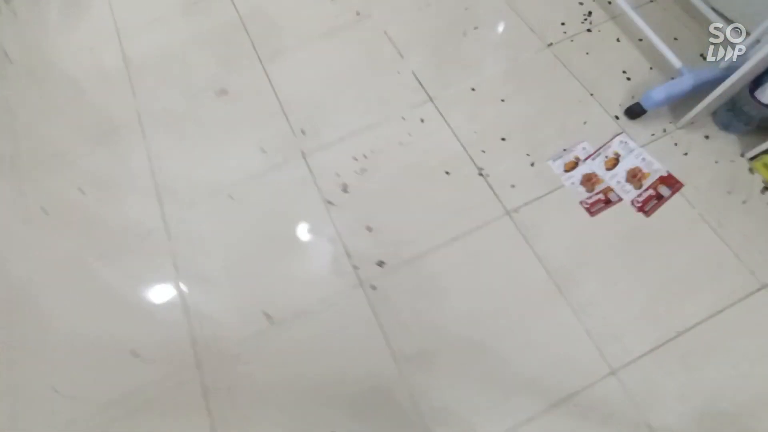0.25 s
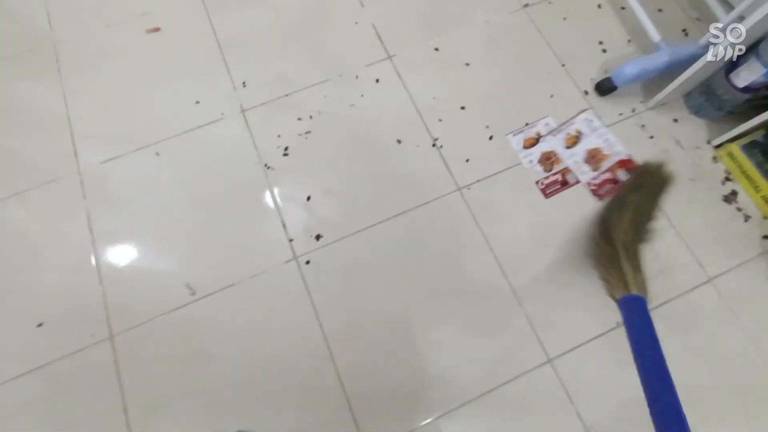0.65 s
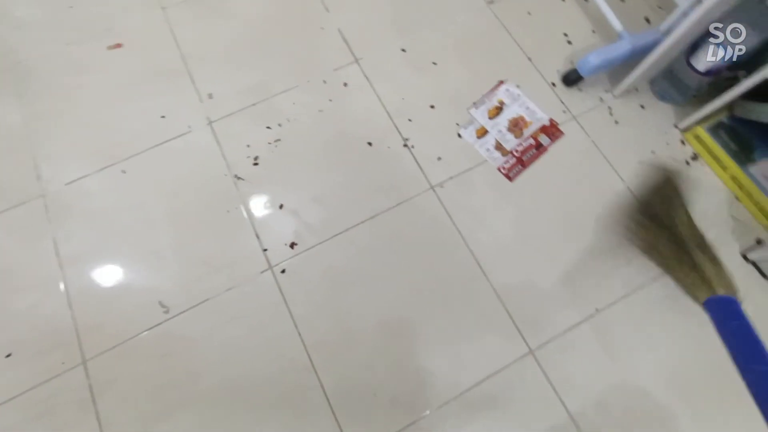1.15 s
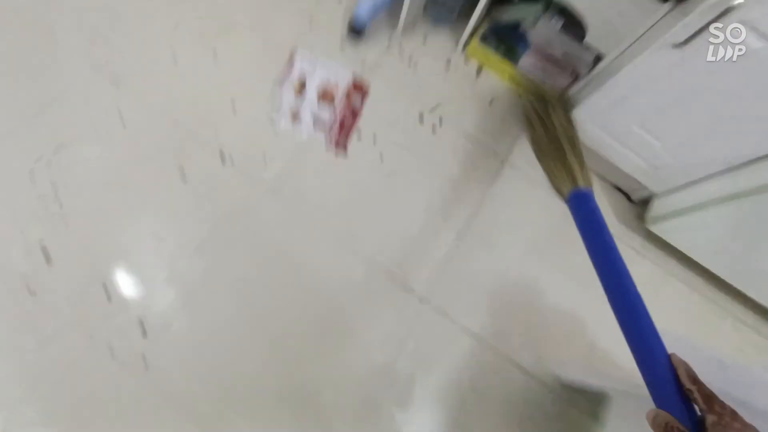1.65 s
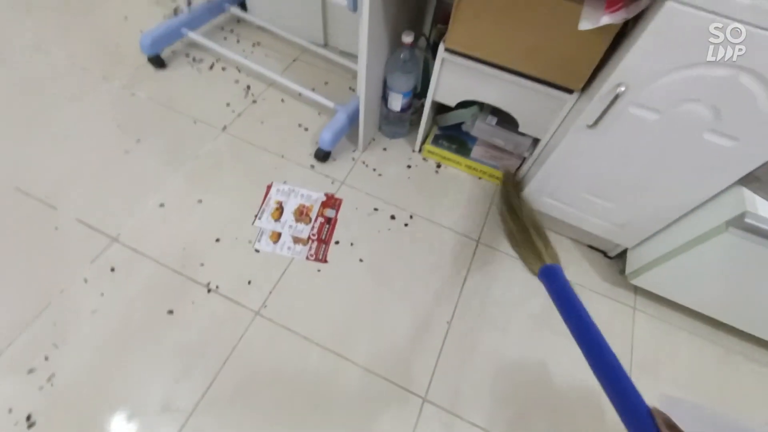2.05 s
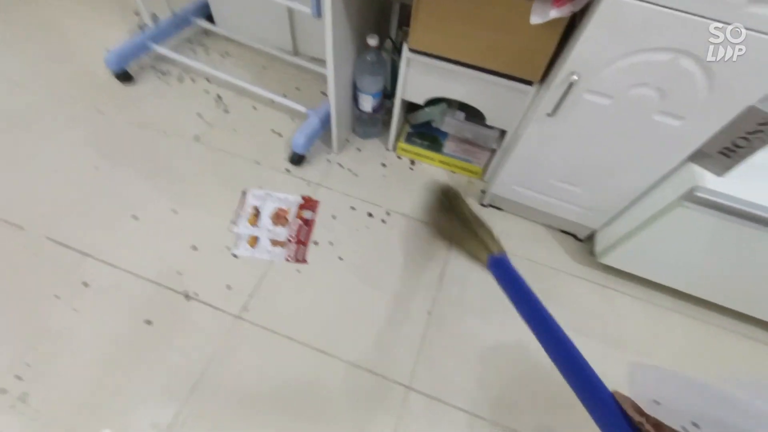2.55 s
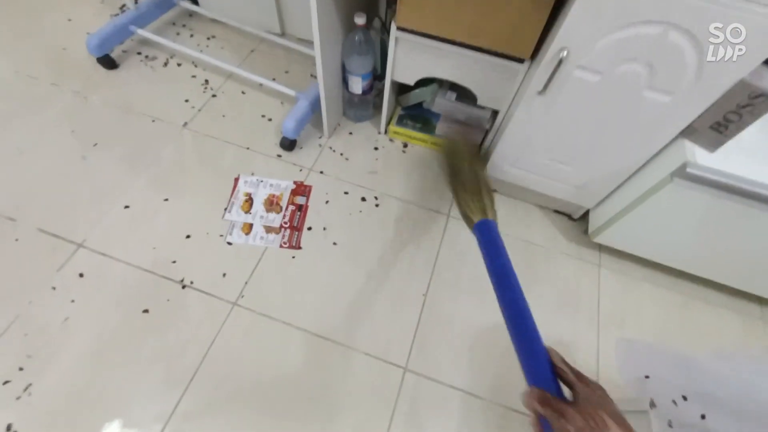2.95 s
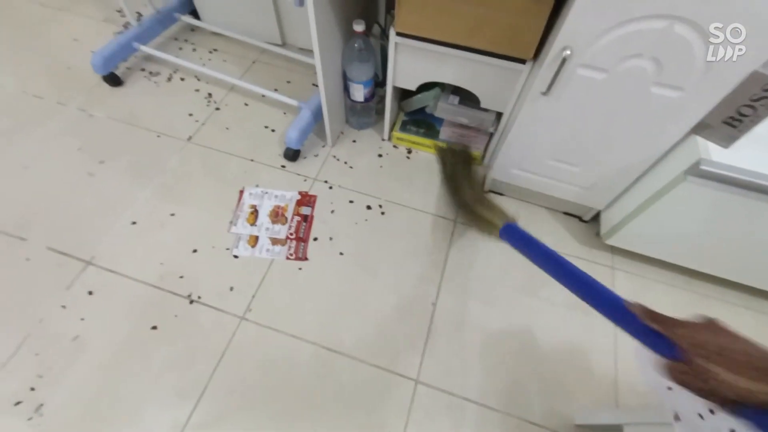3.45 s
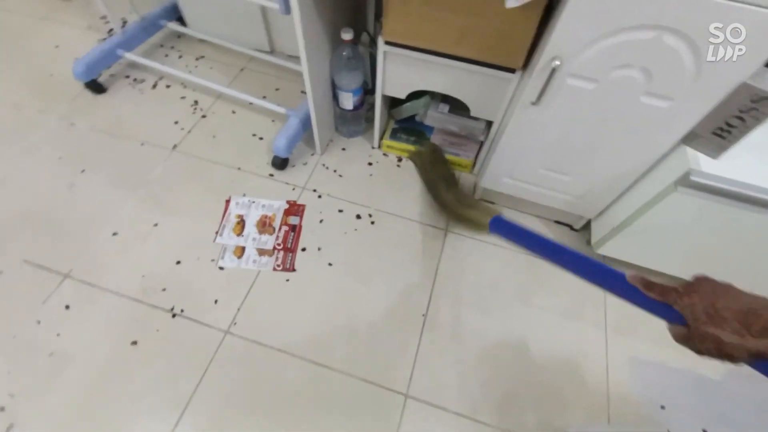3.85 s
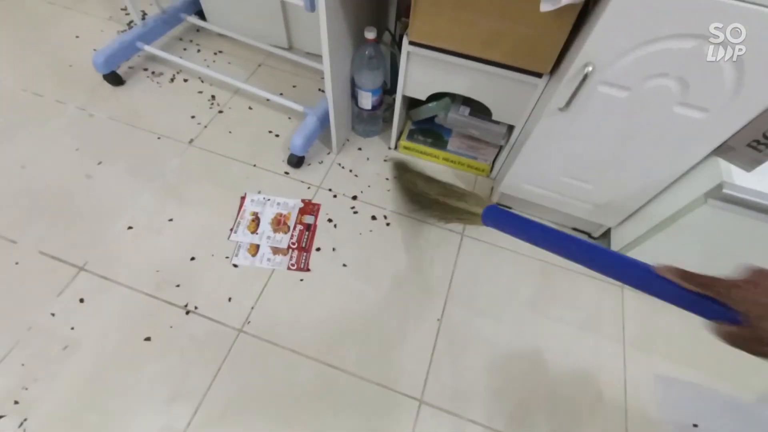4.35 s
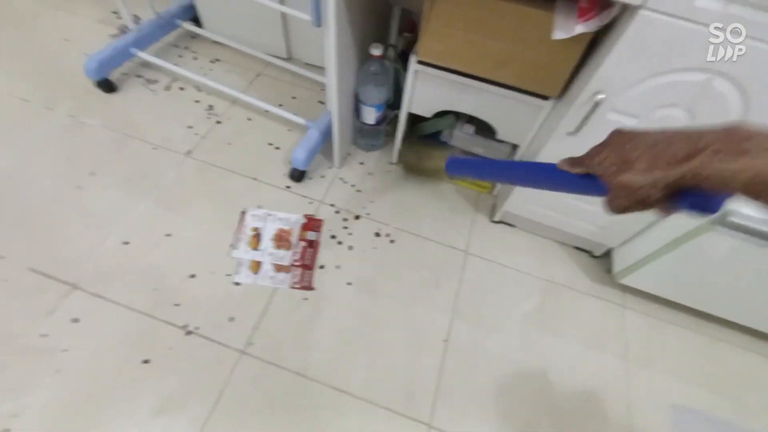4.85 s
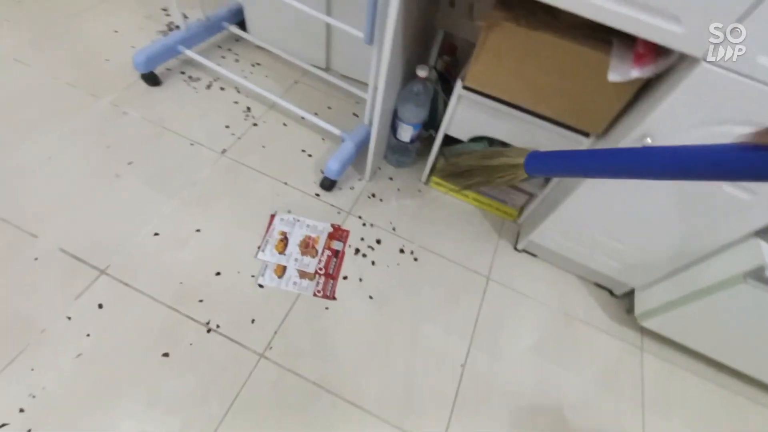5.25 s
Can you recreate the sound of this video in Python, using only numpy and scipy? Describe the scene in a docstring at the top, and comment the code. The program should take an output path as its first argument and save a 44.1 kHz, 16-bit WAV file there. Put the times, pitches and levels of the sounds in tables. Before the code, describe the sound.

Brisk, raspy broom strokes swish across smooth tiles, with tiny crackling ticks and faint cupboard knocks over a low indoor hum.

```python
"""A grass broom sweeps dry petals over a tiled floor beside hollow cupboards in a quiet home.
Thousands of fibre tips slip on the glaze as noise-like pulse trains; stiff fibres twang and tick.
A second, coarser train of slips drives resonances of fibre bundle, stems, cupboard doors and carcass.
Behind: short room echo, a few faint far sine tones, a motor hum of wandering sines, rumbling noise."""
import sys
import numpy as np
from scipy import signal
from scipy.fft import rfft, irfft, next_fast_len
from scipy.io import wavfile
from scipy.ndimage import map_coordinates

SR = 44100
rng = np.random.default_rng(int(sys.argv[2]) if len(sys.argv) > 2 else 0)


def volts_from_decibels(level):
    """Turn decibel levels (scalar or array-like) into linear amplitude factors."""
    exponent = np.asarray(level, float) / 20
    return 10 ** exponent


def wav_out(sig):
    """Save sig, one row per channel (or a flat mono array), as 16-bit PCM at SR to the path in sys.argv[1]."""
    wavfile.write(sys.argv[1], SR, np.round(np.clip(np.atleast_2d(sig).T, -1, 1) * 32767).astype(np.int16))


N = 243423
HALVES = np.array([[.5], [-.5]])   # left, right share of a left-right difference


def rms_one(x):
    """Scales to rms 1."""
    return x / np.sqrt(np.mean(x ** 2) + 1e-20)


def at_hz(points, hz):
    """Table columns interpolated over log frequency."""
    at, *columns = np.transpose(points)
    return [np.interp(np.log(hz), np.log(at), c) for c in columns]


def in_time(rows):
    """Table columns interpolated over time."""
    s, *columns = np.transpose(rows)
    return [np.interp(np.arange(N) / SR, s, c) for c in columns]


def drift(pole_hz):
    """Slow chance of rms 1: noise at every 40th sample through a double one-pole."""
    r = np.exp(-80 * np.pi * pole_hz / SR)
    noise = rng.standard_normal(N // 40 + 2002)
    slow = signal.lfilter([1], [1, -2 * r, r * r], noise)[2000:]   # settled part
    return np.interp(np.arange(N) / 40, np.arange(len(slow)), rms_one(slow))


def resonance(x, hz, width_hz):
    """Two-pole resonance with gain 1 on top."""
    r = np.exp(-np.pi * width_hz / SR)
    poles = [1, -2 * r * np.cos(2 * np.pi * hz / SR), r * r]
    return signal.lfilter([(1 - r * r) / 2, 0, (r * r - 1) / 2], poles, x)


def two_sided(mid_side, likeness, hz):
    """Left and right share the first signal and differ by the second."""
    alike, pan_db = at_hz(likeness, hz)
    alike = np.clip(alike, -1, 1)
    mid, side = np.sqrt(1 + alike) * mid_side[0], np.sqrt(1 - alike) * mid_side[1]
    return volts_from_decibels(HALVES * pan_db) * (mid + side * 2 * HALVES)


def bank(sources, spectrum, likeness, count, patchy_db, patchy_hz):
    """Bands of equal pitch width, each with its level, flicker and likeness; rms 1."""
    edges_hz = np.geomspace(spectrum[0][0], min(spectrum[-1][0], .45 * SR), count + 1)
    out = 0
    for k, (low, high) in enumerate(zip(edges_hz, edges_hz[1:])):
        hz = np.sqrt(low * high)
        band_pass = signal.butter(2, [low, high], "band", fs=SR, output="sos")
        band = signal.sosfilt(band_pass, sources[k % 2])
        level_db = at_hz(spectrum, hz)[0] + patchy_db * drift(patchy_hz)
        out = out + volts_from_decibels(level_db) * two_sided(band, likeness, hz)
    return rms_one(out)


def below(x):
    """Zero-phase low-pass at 6600 Hz: the part of the sound treated apart from the treble."""
    return signal.sosfiltfilt(signal.butter(6, 6600, fs=SR, output="sos"), x)


# left-right likeness of the sweep before its stereo image [pitch_hz, correlation, left_over_right_db]
SWEEP_LIKENESS = [(300, 1, -1), (875, 0.64, -4.5), (2530, 0.42, -3), (5600, 0.43, -1), (14200, 0.68, 1.5)]
# fibre tip spectrum, relative power density [pitch_hz, density_db]
TIP_SPECTRUM = [(3700, -15.5), (4800, -8.5), (5500, -6), (7000, -7), (8700, -5.5), (10000, -9.5)]
# finest tip spectrum, relative power density [pitch_hz, density_db]
FINEST_SPECTRUM = [(10000, -7), (12000, -4), (14500, -4), (18000, -17)]
# fibre bundle modes [pitch_hz, width_hz, relative_db]
BUNDLE_MODES = [(2380, 440, 0.5), (2480, 470, 8.5), (2820, 410, 7), (3130, 104, 2)]
# stem modes [pitch_hz, width_hz, relative_db]
STEM_MODES = [(1284, 140, -3), (1470, 166, 2.5), (1777, 116, 6)]
# cupboard door modes [pitch_hz, width_hz, relative_db]
DOOR_MODES = [(862, 86, -1.5), (922, 187, 8), (1052, 76, -1.5)]
# cupboard carcass modes [pitch_hz, width_hz, relative_db]
CARCASS_MODES = [(258, 93, -1), (358, 84, -3.5), (624, 204, -7)]
# head pressure and nearness to the cupboards, levels re tips
# [time_s, stems_db, door_db, carcass_db]
PRESSURE = [(0, -41, -24, -33), (.5, -25, -13, -18), (.8, -20.5, -28, -34), (1.05, -12, -14.5, -18),
            (1.42, -18.5, -20, -24.5), (1.8, -13.5, -17, -22), (2.1, -14, -20.5, -24),
            (2.43, -25, -20, -30), (2.9, -19.5, -20.5, -17.5), (3.34, -12, -7, -14),
            (3.5, -12.5, -14.5, -23), (3.8, -9.5, -16, -18.5), (4.3, -17.5, -23.5, -28.5),
            (4.72, -15.5, -27, -23), (4.85, -20, -19, -11), (4.97, -8.5, -11, -15), (5.35, -20, -23.5, -24),
            (5.45, -17.5, -14, -13)]


def broom():
    """Tips hiss, bundle and stems rasp, door and carcass add body; the head moves left to middle."""
    tips, finest, bundle = pushes()
    stems_db, door_db, carcass_db = in_time(PRESSURE)
    fine = [slips(7000, uneven_db=1.5, clump_db=1.65) for source in range(2)]
    coarse = slips(4000, uneven_db=0.5, clump_db=1.0)
    sound = tips * bank(fine, TIP_SPECTRUM, SWEEP_LIKENESS, count=16, patchy_db=2.5, patchy_hz=18)
    sound = sound + tips * volts_from_decibels(-5.5) * twang(1000, cycles=76)
    sound = sound + finest * bank(fine, FINEST_SPECTRUM, SWEEP_LIKENESS, count=10,
                                  patchy_db=2.0, patchy_hz=9.2)
    bodies = [(bundle, BUNDLE_MODES), (tips * volts_from_decibels(stems_db), STEM_MODES),
              (tips * volts_from_decibels(door_db), DOOR_MODES), (tips * volts_from_decibels(carcass_db), CARCASS_MODES)]
    for height, modes in bodies:
        sound = sound + height * body(modes, coarse, patchy_db=4.0)
    return stereo_image(sound + ticks() + bumps())


# pushes of the broom head
# [lands_s, swell_s, lift_db_per_s, tips_db, finest_re_tips_db, bundle_re_tips_db]
BROOM_PUSHES = [(-.01, 0.084, 334, -47.5, 5, -12.5), (.13, 0.12, 212, -56, 1.5, -11.5),
                (0.444, 0.13, 184, -51, -1, -7), (.58, 0.035, 295, -57, 13.5, -28),
                (0.682, 0.11, 148, -48, 0.5, -30), (0.96, 0.034, 170, -46.5, 6.5, -4.5),
                (1.059, 0.069, 170, -57, 14.5, -11), (1.17, 0.055, 159, -59.5, 10.5, -23),
                (1.376, 0.044, 267, -37.5, 2, -3.5), (1.50, 0.013, 192, -54, 8, -27),
                (1.69, 0.042, 206, -45, 1, -4.5), (1.73, 0.066, 240, -37.5, -0.5, -9),
                (2.052, 0.038, 200, -41, -3.5, -6), (2.09, 0.065, 264, -40.5, 4, -6.5),
                (2.402, 0.017, 218, -46.5, -4, -7), (2.553, 0.013, 198, -67.5, 6, -6),
                (2.712, 0.025, 200, -53.5, 3, -17), (2.74, 0.043, 203, -39.5, -1, -7),
                (2.988, 0.062, 234, -45.5, 2.5, -5.5), (3.1, 0.041, 222, -55, 4.5, -2),
                (3.291, 0.046, 197, -40.5, 1, -4), (3.37, 0.031, 200, -49, -3, -1.5),
                (3.43, 0.068, 402, -41.5, 2.5, -2.5), (3.736, 0.032, 193, -43.5, 2, -3.5),
                (3.779, 0.034, 202, -45, -5, 1), (3.859, 0.061, 326, -44.5, 1.5, -4.5),
                (3.949, 0.016, 300, -65.5, 24.5, -24), (4.186, 0.059, 200, -41.5, -2.5, -8),
                (4.26, 0.054, 205, -52, -8, -6.5), (4.329, 0.033, 400, -48, -0.5, -11),
                (4.5, 0.016, 124, -75, 4, -8), (4.689, 0.039, 198, -44.5, -2, -14),
                (4.75, 0.044, 150, -45, -1.5, -11.5), (4.862, 0.12, 339, -37.5, 1, -9),
                (5.1, 0.074, 200, -72, 6, -6), (5.332, 0.08, 165, -42, 0, -10.5),
                (5.47, 0.076, 200, -45.5, -1, -10)]


def pushes():
    """Heights of tips, finest tips, bundle: each push lands, swells, lifts, trails; powers add."""
    touch_s, landing_db_per_s, swell_db = 0.0084, 1000, 12
    trail_db, trail_db_per_s, trail_finest_db = -27.5, 70, 5.5
    t, power = np.arange(0, N + 32, 32) / SR, 0
    for lands_s, swell_s, lift_db_per_s, tips_db, finest_db, bundle_db in BROOM_PUSHES:
        after_s = t - lands_s - swell_s   # time past the peak
        swell_lift_db = np.minimum(swell_db * after_s / swell_s, -lift_db_per_s * after_s)
        landing_db = np.minimum(landing_db_per_s * (t - lands_s - touch_s), 0)
        main = volts_from_decibels(tips_db + swell_lift_db + landing_db)
        trail = (after_s > 0) * volts_from_decibels(tips_db + trail_db - trail_db_per_s * np.abs(after_s))
        trail = trail * volts_from_decibels(np.array([[0], [trail_finest_db], [0]]))
        shares = volts_from_decibels(2 * np.array([[0], [finest_db], [bundle_db]]))   # power ratios
        power = power + (main ** 2 + trail ** 2) * shares
    return [np.interp(np.arange(N) / SR, t, np.sqrt(p)) for p in power]


def slips(per_s, uneven_db, clump_db):
    """Two trains of fibre slips: random pulses of uneven size and either sign, in clumps."""
    sizes_db = uneven_db * np.minimum(rng.exponential(1, (2, N)), 5)
    sizes = volts_from_decibels(sizes_db) * rng.choice([-1, 1], (2, N))
    happens = rng.random((2, N)) < per_s / SR
    return sizes * happens * volts_from_decibels(clump_db * drift(41)) + 1e-18


def twang(per_s, cycles):
    """Stiff fibres are plucked and ring briefly at pitches set by their free length."""
    train = slips(per_s, uneven_db=0.5, clump_db=1.5)
    dealt, out = rng.integers(0, 36, N), 0   # which fibre each slip plucks
    for k, hz in enumerate(np.geomspace(2000, 11000, 36) * rng.uniform(1.0, 1.02, 36)):
        rung = resonance(train * (dealt == k) + 1e-18, hz, hz / cycles)
        out = out + two_sided(rung, SWEEP_LIKENESS, hz)
    return rms_one(out)


def body(modes, train, patchy_db):
    """The slips ring broad modes, each filtered twice so that the skirts are steep; rms 1."""
    out = 0
    for hz, width_hz, db in modes:
        rung = resonance(resonance(train, hz, 1.5 * width_hz), hz, 1.5 * width_hz)
        out = out + volts_from_decibels(db + patchy_db * drift(19.2)) * two_sided(rung, SWEEP_LIKENESS, hz)
    return rms_one(out)


# single stiff fibres and petals snapping loose, and at 1.516 s a crack marking a sudden swell of the sweep,
# peak before stereo image [start_s, peak_db, pitch_hz]
SNAPS = [(0.6005, -37, 13500), (0.967, -44, 13750), (1.3904, -27, 14100), (1.404, -20, 13300),
         (1.4257, -31, 10400), (1.516, -31, 11100), (1.698, -37, 13200), (2.064, -35, 9000),
         (2.406, -30, 5740), (2.409, -39, 2760), (2.423, -34, 6690), (2.561, -49, 11800),
         (2.716, -42, 11900), (2.7456, -33, 9900), (2.9923, -42, 10100), (3.053, -27, 10200),
         (3.3, -49, 2480), (3.3254, -36, 11800), (3.744, -43, 5460), (3.974, -39, 11500),
         (4.1939, -52, 13000), (4.509, -45.5, 11100), (4.6954, -56, 6620), (4.779, -33, 10700),
         (5.086, -39, 11200), (5.155, -46, 13200), (5.221, -41, 12200), (5.337, -56, 7350)]


def ticks():
    """Each snap is a millisecond crack over the whole treble plus a short ring at its own pitch."""
    out, t = np.zeros(N), np.arange(400) / SR
    for start_s, peak_db, hz in SNAPS:
        crack = rng.standard_normal(400) * np.exp(-t / 0.002)
        treble = resonance(resonance(crack, 9000, 9000), 9000, 9000)
        snap = resonance(crack, hz, .25 * hz) + volts_from_decibels(-6) * treble
        out[round(start_s * SR):][:len(t)] += volts_from_decibels(peak_db) * snap / np.abs(snap).max()
    return out


# broom bumps hollow furniture, peak before stereo image [start_s, peak_db, pitch_hz]
FURNITURE_BUMPS = [(0.481, -57, 469), (1.413, -59, 221), (2.089, -53.5, 225), (2.78, -77, 204),
                   (3.033, -51, 346), (3.322, -56, 454), (4.791, -53.5, 250), (4.926, -57, 240),
                   (5.438, -62, 395)]


def bumps():
    """Each bump is a short damped ring at its own pitch with a rounded start."""
    out, t = np.zeros(N), np.arange(int(.12 * SR)) / SR
    for start_s, peak_db, hz in FURNITURE_BUMPS:
        ring = (1 - np.exp(-t * 150)) * np.exp(-t * hz / 3.9) * np.sin(2 * np.pi * hz * t)
        ring = volts_from_decibels(peak_db) * ring / np.abs(ring).max()
        start = round(start_s * SR)
        out[start:][:len(t)] += ring[:N - start]
    return out


# left lead and level as the head moves; last column: level of the treble's left-right difference
# [time_s, left_ahead_ms, left_over_right_db, treble_difference_db]
STEREO_COURSE = [(0, 0.31, 5.5, 4), (.5, 0.28, 3, -2.5), (1.4, 0.34, 2.5, 2.5), (1.8, 0.12, 1, 2.5),
                 (2.1, .11, 1, 2), (2.2, 0.15, -0.5, -11), (3.4, 0.015, 0.5, -10), (5.2, 0.051, 1.5, -8),
                 (5.45, 0.021, .5, -1)]


def stereo_image(sound):
    """Left-right lead and level follow the head; the treble's difference narrows and widens over time."""
    ahead_ms, pan_db, difference_db = in_time(STEREO_COURSE)
    low = below(sound)
    left, right = sound - low
    treble = (left + right) / 2 + volts_from_decibels(difference_db) * (left - right) * HALVES
    low[0] = map_coordinates(low[0], [np.arange(N) + ahead_ms * SR / 1000], mode="nearest")
    return (low + treble) * volts_from_decibels(HALVES * pan_db)


def room(x):
    """Eight feedback delays a side, duller on every round."""
    t60_s, wall_cut_hz, gain_db = 0.074, 23000, -3.5
    out, size = np.zeros((2, N)), next_fast_len(N + SR)
    w = 2 * np.pi * np.arange(size // 2 + 1) / size
    dull = 1 / (1 + 1j * w * SR / (2 * np.pi * wall_cut_hz))
    heard = rfft(x, size)
    for k, lag in enumerate(rng.uniform(.009, 0.027, 16) * SR):
        loop = volts_from_decibels(-60 * lag / SR / t60_s) * dull * np.exp(-1j * w * round(lag))
        out[k % 2] += irfft(heard * loop / (1 - loop), size)[:N] * (-1) ** (k // 2)
    return volts_from_decibels(gain_db) * out


# faint far tones, rms before soft ends and waver
# [start_s, length_s, pitch_hz, level_db, left_over_right_db]
FAR_TONES = [(0.48, 0.37, 1172, -79.5, -6), (0.669, .21, 1243, -69.5, 4), (1.063, 0.042, 1313, -64.5, -8),
             (1.478, 0.11, 1303, -73, 7), (2.477, 0.16, 1206, -72.5, -2), (5.127, 0.048, 3340, -73, 4),
             (5.134, 0.19, 2970, -82, 14), (5.163, 0.093, 3840, -79, -3)]


def far_tones():
    """Thin sines with soft ends, broken up in level and blurred in pitch on their way."""
    t, out = np.arange(N) / SR, np.zeros((2, N))
    for start_s, length_s, hz, level_db, pan_db in FAR_TONES:
        ends = np.clip(np.minimum(t - start_s, start_s + length_s - t) / .025, 0, 1)
        shape = ends * volts_from_decibels(level_db + 4 * drift(25))
        phase = 2 * np.pi * np.cumsum(hz * (1 + .009 * drift(20))) / SR
        tone = np.sqrt(2) * np.sin(phase + np.array([[0], [1.6]]))   # right side 1.6 rad ahead
        out += shape * tone * volts_from_decibels(pan_db * HALVES)
    return out


# motor lines, rms before waver [pitch_hz, level_db, waver_db]
HUM_LINES = [(96, -72, 2.5), (143.6, -67.5, 4.5), (194, -75, 3.5)]


def hum():
    """Motor lines: sines whose level and pitch wander."""
    out = 0
    for hz, level_db, waver_db in HUM_LINES:
        phase = 2 * np.pi * np.cumsum(hz + 2.5 * drift(3.0)) / SR
        out = out + volts_from_decibels(level_db + waver_db * drift(6.0)) * np.sin(phase)
    return np.sqrt(2) * out


# room rumble spectrum, relative power density [pitch_hz, density_db]
RUMBLE_SPECTRUM = [(12, -44), (20, -10.5), (114, -10), (147, -12), (205, -20.5), (223, -13), (490, -18),
                   (747, -29.5), (2640, -33), (2870, -28.5), (5320, -33.5), (12700, -32), (16400, -37)]
# left-right likeness of the rumble [pitch_hz, correlation, left_over_right_db]
RUMBLE_LIKENESS = [(31.2, 0.64, -6), (140, 0.65, -0.5), (503, 0.38, -2.5), (5250, 0.043, -1.5),
                   (7000, 0.96, 0)]


def room_tone():
    """Steady rumble: noise in bands with slight slow flicker, rms -63.5 dB."""
    noise = rng.standard_normal((2, 2, N))
    return volts_from_decibels(-63.5) * bank(noise, RUMBLE_SPECTRUM, RUMBLE_LIKENESS, count=30,
                             patchy_db=1.47, patchy_hz=5.0)


def scene():
    """Broom and its echo over the background; the echo is mixed to one channel above 6600 Hz."""
    sweep = broom()
    echo = room(sweep.mean(axis=0))
    echo = echo.mean(axis=0) + below(echo[0] - echo[1]) * HALVES
    return sweep + echo + far_tones() + hum() + room_tone()


def top_cut(x):
    """Nothing passes above the cut-off."""
    return signal.sosfilt(signal.butter(12, 16500, fs=SR, output="sos"), x)


def record(dry):
    """Steep low-pass, 70 dB down from 15950 Hz up."""
    cut = signal.sosfilt(signal.cheby2(20, 70, 15950, fs=SR, output="sos"), dry)
    return top_cut(cut)


dry = scene()
out = record(dry)
wav_out(out)
```